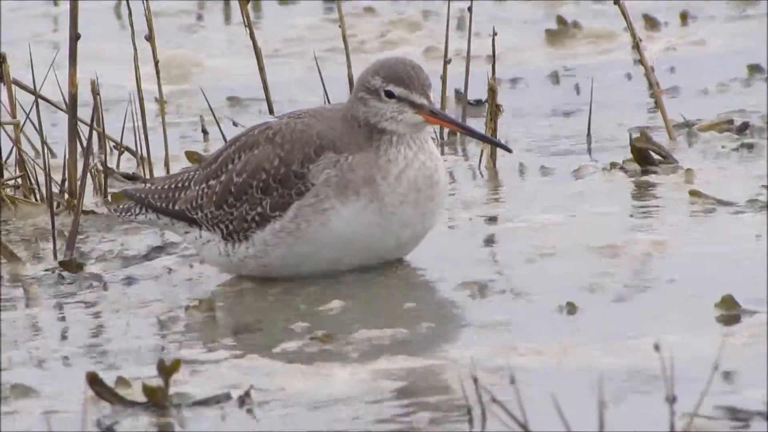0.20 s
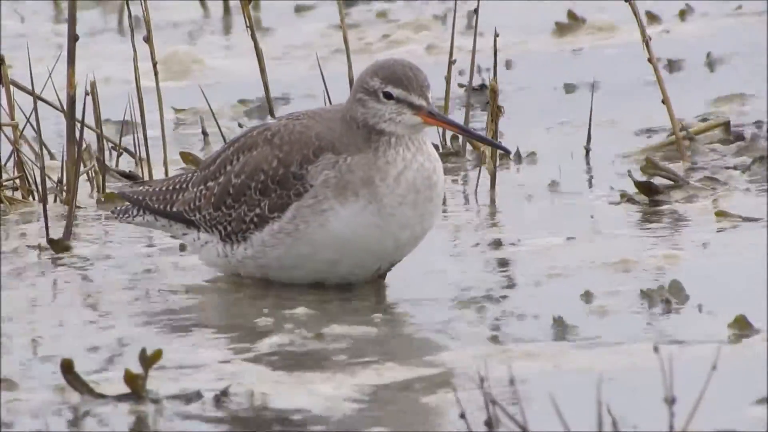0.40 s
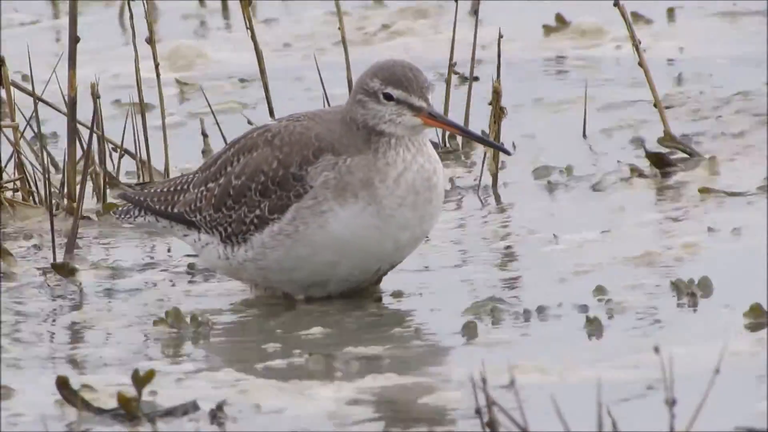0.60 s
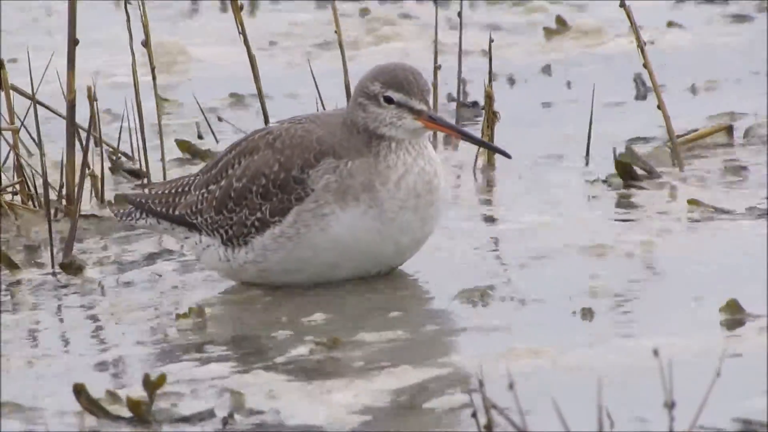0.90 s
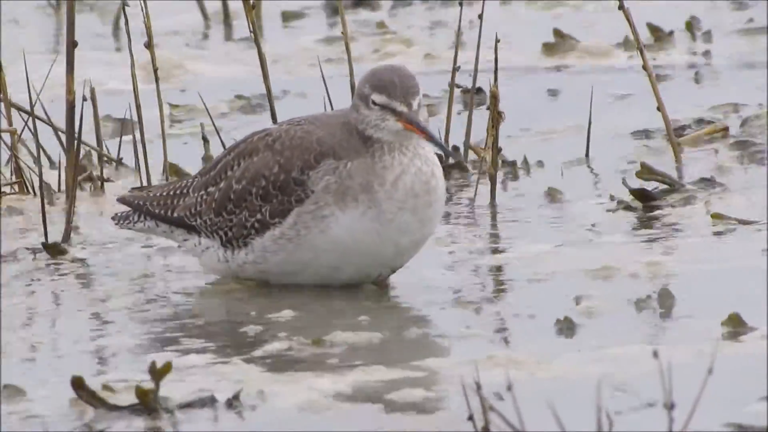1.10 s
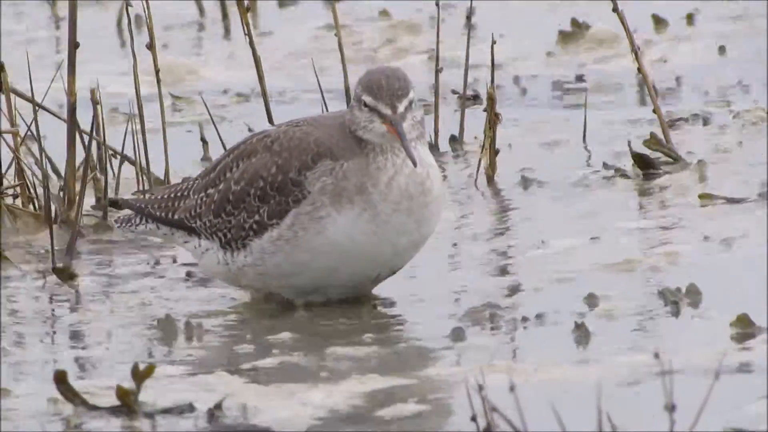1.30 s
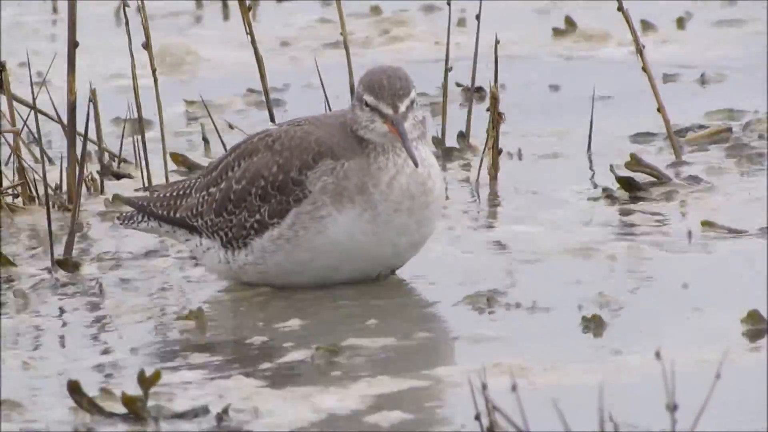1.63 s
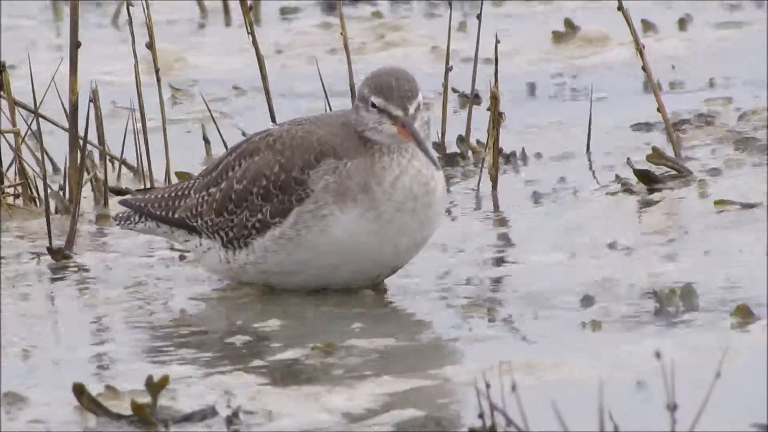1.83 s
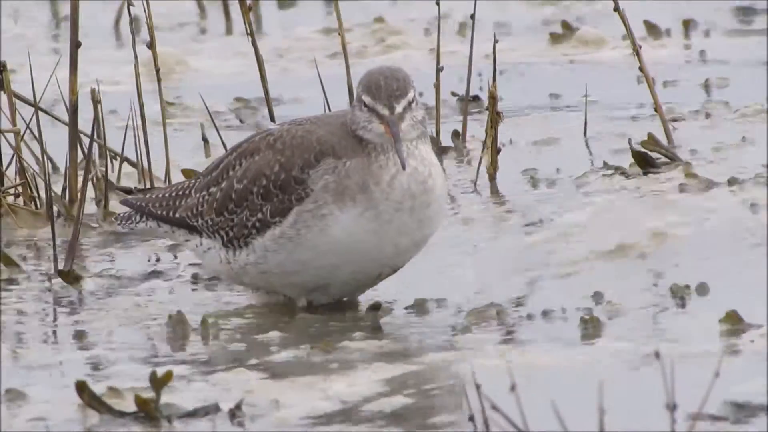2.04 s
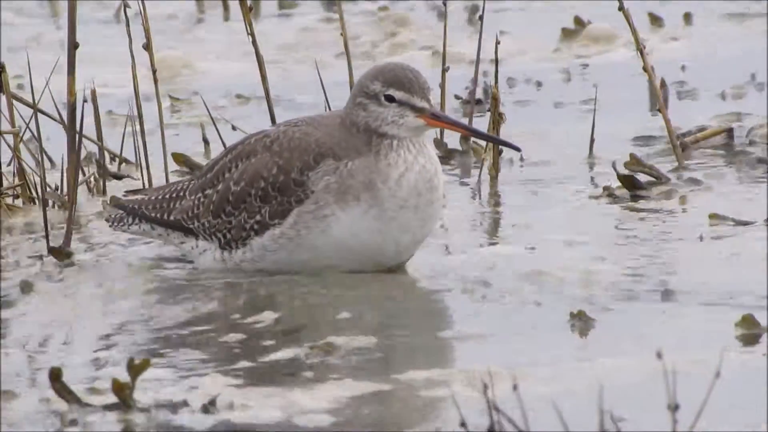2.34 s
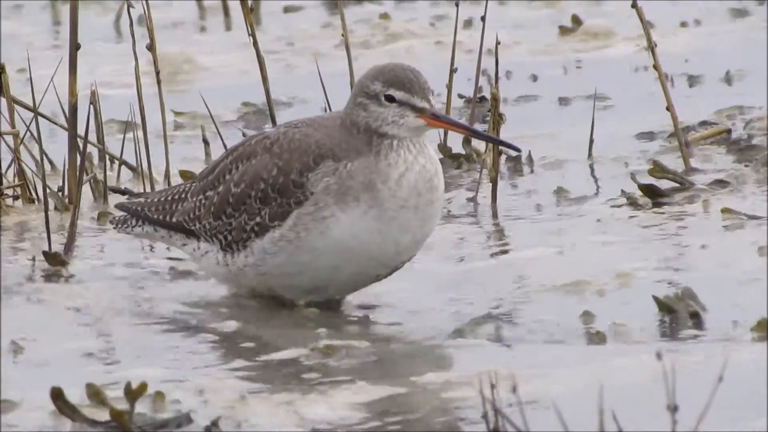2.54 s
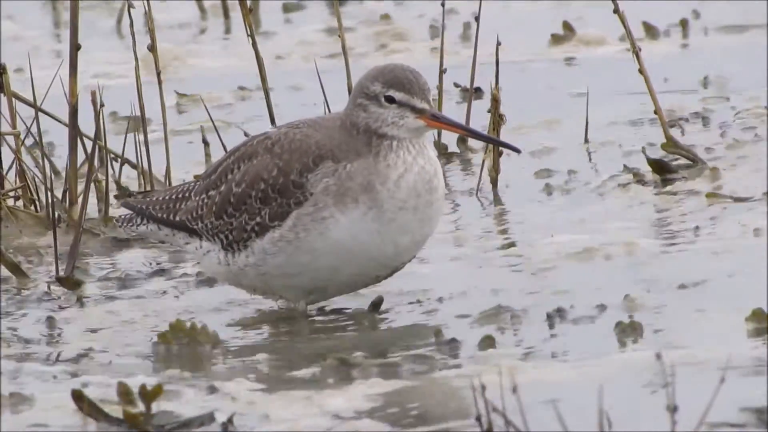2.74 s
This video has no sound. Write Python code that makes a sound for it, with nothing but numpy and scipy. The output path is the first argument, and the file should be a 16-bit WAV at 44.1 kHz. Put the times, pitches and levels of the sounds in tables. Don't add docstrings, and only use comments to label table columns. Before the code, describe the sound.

A wading bird repeats a harsh, rattly call six times, the last ones longer and one cracking, in shallow water outdoors; strong wind thumps and rumbles on the stereo microphone, louder than the bird.

```python
import sys
import numpy as np
from scipy import signal
from scipy.fft import rfft, irfft
from scipy.io import wavfile
from scipy.ndimage import uniform_filter1d

SR = 44100
rng = np.random.default_rng(int(sys.argv[2]) if len(sys.argv) > 2 else 0)


def gain_from_decibels(decibels):
    exponent = np.asarray(decibels, float) / 20
    return 10 ** exponent


def master(y):
    cut = np.clip(np.atleast_2d(y).T, -1, 1)
    pcm = np.round(cut * 32767)
    wavfile.write(sys.argv[1], SR, pcm.astype(np.int16))


N = 127890
T = np.arange(N) / SR
OPPOSED = np.array([[1], [-1]])


def level(x, db):
    return x * gain_from_decibels(db) / np.sqrt(np.mean(x ** 2))


def walk(rate):
    hold = int(SR / rate)
    steps = np.repeat(rng.standard_normal(N // hold + 1), hold)
    return 1.472 * uniform_filter1d(uniform_filter1d(steps, hold), hold)[:N]


def colour(x, points, lo_hz=0.77, hi_hz=19200.0):
    log_hz = np.log(np.arange(N // 2 + 1) * SR / N + 1)
    points = np.array(points, float)
    gain = gain_from_decibels(np.interp(log_hz, np.log(points[:, 0]), points[:, 1]))
    above_lo = 1 / (1 + np.exp(8 * (np.log(lo_hz) - log_hz)))
    above_hi = 1 / (1 + np.exp(8 * (np.log(hi_hz) - log_hz)))
    return irfft(rfft(x) * gain * (above_lo - above_hi), N)


def ramp(x):
    return np.sin(np.pi / 2 * np.clip(x, 0, 1)) ** 2


def thump(start, db, hz, cycles, turn):
    c = np.clip((T - start) * hz, -6, 12)
    swell = np.exp(-(c / (cycles * np.where(c < 0, .7, 1.2))) ** 2)
    return gain_from_decibels(db) * swell * np.cos(2 * np.pi * (c - 0.11 * c ** 2 + turn))


def wind():
    # (time [s], peak level [dB], frequency [Hz], opposed peak level [dB])
    buffets = [(0.366, -15.5, 143, -19), (0.465, -19.5, 117, -35), (0.555, -12, 173, 0),
               (0.569, -18, 150, -12.5), (0.617, -14.5, 280, -6), (0.729, -12.5, 119, -9.5),
               (0.762, -12.5, 183, -18), (1.077, -15, 159, -27.5), (1.234, -15.5, 143, -17.5),
               (1.334, -14.5, 196, -18), (1.364, -12, 134.5, -14.5), (1.436, -17.5, 124, -23.5),
               (1.545, -18, 186, -21), (1.558, -22, 243, -38), (1.646, -17, 127, -26),
               (1.663, -12, 159, -44), (1.697, -10.5, 127, -19.5), (1.718, -8.5, 155, -8.5),
               (1.742, -2, 196, -6.5), (1.777, -29, 146, -12.5), (1.876, -11, 226, -15),
               (2.011, -13.5, 196, -12.5), (2.2, -16.5, 142.6, -16.5), (2.235, -20.5, 101, -52),
               (2.437, -11.5, 126, -23), (2.449, -15, 161, -29), (2.549, -12, 106.4, -19),
               (2.58, -15, 149, -14.5), (2.629, -21, 106, -26), (2.852, -18, 192, -27)]
    # (time [s], peak level [dB])
    flaps = [(0.123, -25), (0.237, -20), (.294, -21), (0.659, -20.5), (0.831, -23), (0.86, -22),
             (0.938, -25.5), (.97, -21.5), (1.161, -25), (1.287, -29.5), (1.488, -25), (1.513, -29),
             (1.614, -29), (1.835, -21.5), (1.904, -24), (1.989, -24), (2.039, -22), (2.275, -23),
             (2.408, -21), (2.477, -18.5)]
    # (time [s], level [dB])
    gusts = np.array([(0, -39.5), (1.75, -35.5), (2.9, -39.5)])
    # (frequency [Hz], level [dB per Hz])
    mid_shape = [(22, -46), (45, -6.5), (75, 8), (130, 2), (200, -3.5), (330, -12.5), (600, -32),
                 (2500, -94)]
    # (frequency [Hz], level [dB per Hz])
    side_shape = [(30, -47.5), (60, -13), (110, -13), (190, -6), (270, -10), (450, -22), (750, -35.5),
                  (2500, -93)]
    # (frequency [Hz], level [dB])
    opposed_cut = [(20, -23), (60, -14), (150, 4.5), (800, 1)]
    flap_hz, flap_opposed_db = 113.7, -8
    buffet_cycles, opposed_cycles, opposed_hz = 0.58, 0.4, 238
    churn_s, churn_db = 0.018, 19.5
    wind_db, swell_db, flap_db, own_db = 3.5, 0.8, 2.2, 1.5

    mid, side, churn = 0, 0, 0
    hits = list(buffets) + [(s, db, flap_hz, db + flap_opposed_db) for s, db in flaps]
    for (s, db, hz, opposed_db), (a, b, c) in zip(hits, rng.random((len(hits), 3))):
        mid = mid + thump(s, db, hz, buffet_cycles, a)
        side_hz = .5 * hz + opposed_hz * (0.69 + 0.084 * c)
        side = side + thump(s, opposed_db, side_hz, opposed_cycles, b)
        spread_s = churn_s * np.where(T < s, .35, 1)
        churn = churn + (gain_from_decibels(db) + gain_from_decibels(opposed_db)) * np.exp(-((T - s) / spread_s) ** 2)

    gust = gain_from_decibels(np.interp(T, gusts[:, 0], gusts[:, 1]))
    shared = swell_db * walk(9.7) + flap_db * walk(44.97)
    edges_hz = (1, 70, 140, 280, 560, 2e4)
    depths = (0.25, 0.2, 1.01, 1.035, 0.92)
    beds = []
    for shape in (mid_shape, side_shape):
        bed = 0
        for lo, hi, depth in zip(edges_hz, edges_hz[1:], depths):
            sway = gain_from_decibels(depth * shared + own_db * walk(21.85))
            stir = 1 + depth * gain_from_decibels(churn_db) * churn
            bed = bed + colour(rng.standard_normal(N) * gust * stir * sway, shape, lo, hi)
        beds.append(bed * gain_from_decibels(wind_db) * 10)
    return mid + beds[0], colour(side, opposed_cut) + beds[1]


def air():
    # (frequency [Hz], level [dB])
    mid_shape = [(600, 1.5), (800, -2), (1600, -8.5), (2200, -14.5), (6000, -20.5), (14500, -24.5),
                 (15300, -28), (16000, -51.5)]
    # (frequency [Hz], level [dB])
    side_shape = [(600, -9), (900, -10.5), (1400, -14.5), (2100, -25), (4200, -28.5), (14500, -30.5),
                  (15300, -40), (16000, -58)]
    sway = gain_from_decibels(1.0 * walk(5.72) + 1.56 * walk(23.64))
    mid = colour(rng.standard_normal(N), mid_shape, lo_hz=560.0) * sway
    side = colour(rng.standard_normal(N), side_shape, lo_hz=560.0) * sway
    return level(mid, -63.5 + 5), level(side, -59.5)


def camera_whistle():
    whistle_hz, beat_hz = 15734.3, 13.49
    tone = np.sin(2 * np.pi * whistle_hz * T)
    twin = gain_from_decibels(-1) * np.sin(2 * np.pi * (whistle_hz + beat_hz) * T)
    return gain_from_decibels(-73.5) * np.sqrt(2) * (tone + twin)


def whine(start, length, db):
    harmonics_db = (-4.5, 2, -1.5, 4, -2.5, 1, -14, -11, -11, -41)
    from_hz, to_hz, rise_db = 570, 683, 5.5
    u = np.clip((T - start) / length, 0, 1)
    hz = (from_hz + (to_hz - from_hz) * u) * (1 + 0.0084 * walk(300))
    phase = 2 * np.pi * np.cumsum(hz) / SR
    tone = 0
    for k, harmonic_db in enumerate(harmonics_db):
        tone = tone + gain_from_decibels(harmonic_db - 0.25 * k * (1 - u)) * np.cos((k + 1) * phase + k ** 2)
    return level(tone, db) * gain_from_decibels(rise_db * u) * ramp(u / .15) * ramp((1 - u) / .07)


def snaps():
    # (time [s], peak level [dB], left-right difference [dB])
    edges = [(0.11, -33, 5), (0.367, -33, -2.5), (0.551, -21, -10), (0.613, -17, 3), (0.712, -29, -5),
             (0.72, -32, -9), (0.828, -31.5, -2), (1.074, -39, -7), (1.225, -39, 6), (1.33, -35, -1.0),
             (1.535, -41, 2), (1.553, -32.5, 5), (1.657, -39, -3), (1.68, -47, 7), (1.71, -23, 4),
             (1.737, -20.5, 10), (1.872, -28.5, 0), (1.986, -23, -1), (2.097, -37, 0.0),
             (2.194, -27.5, -13), (2.27, -37.5, 0.5), (2.421, -41, 3), (2.442, -33, -7), (2.537, -38, 2),
             (2.576, -27.5, 3), (2.844, -35, -1)]
    snap_hz, cycles, snap_db, opposed_db, late_s = 425, 0.77, -1.5, 1.5, 0.00296
    out = 0
    for (s, db, pan_db), (a, b) in zip(edges, rng.random((len(edges), 2))):
        hz = snap_hz * (0.78 + 0.27 * b)
        mid = thump(s + late_s, db + snap_db, hz, cycles, a)
        side = thump(s + late_s, db + snap_db, hz, cycles, a + 1 / 4)
        out = out + (mid + gain_from_decibels(opposed_db) * side * OPPOSED) * gain_from_decibels(pan_db / 2 * OPPOSED)
    return out


def call(start, length, top_hz, open_hz, gap_s, rate0, rate1, attack, bow,
         db, peak, fade_db, end_db, rasp_db, throat):
    step_hz, release_s, end_drop = 1002, 0.059, 0.26
    gap_share, gap_db, gap_drop, drop_share = 0.17, -12.5, 0.12, 0.14
    crack_from_s, crack_until_s, crack_heal_s, crack_left = 2.1, 2.47, .015, .05
    crack_share, crack_low, crack_high, crack_rest = .55, -.28, .42, -.12
    crack_flip_db, crack_rest_db, crack_tire_db = 0.5, -2.5, -13.5
    wobble, crack_wobble = .006, .018

    span = slice(int(start * SR), min(N, int((start + length) * SR)))
    t = T[span] - start
    u = t / length
    rise = np.clip(t / attack, 0, 1)
    end = 1 - ramp((length - t) / release_s)

    turns = np.cumsum(rate0 + (rate1 - rate0) * u) / SR
    jitter = 0.013 * np.cumsum(walk(60)[span]) * 60 / SR
    throb = (turns - np.interp(gap_s - start, t, turns) + jitter) % 1
    gap = np.exp(-(np.minimum(throb, 1 - throb) / gap_share) ** 2)
    dip = np.exp(-(np.minimum(throb, 2 * (1 - throb)) / drop_share) ** 2)

    heal = ramp((crack_until_s - T[span]) / crack_heal_s)
    crack = (T[span] > crack_from_s) * np.maximum(heal, crack_left)
    flipped = throb < crack_share
    flip = np.where(flipped, crack_low + (crack_high - crack_low) * throb / crack_share, crack_rest)

    climb = open_hz + (top_hz - open_hz) * np.sin(np.pi / 2 * rise)
    bend = 1 - bow * ((u - peak) / np.where(u < peak, peak, 1 - peak)) ** 2 - end_drop * end
    unsteady = (wobble * (1 + 6 * gap + 10 * end) + crack_wobble * crack) * walk(900)[span]
    hz = climb * bend * (1 - gap_drop * (1 - crack) * dip + crack * flip + unsteady)
    phase = 2 * np.pi * np.cumsum(hz) / SR

    k = np.arange(1, 13)[:, None]
    bright = 0.47 * crack - 2.0 * end - 0.59 * (1 - rise)
    throat_db = [-40, *throat, -45]
    steps = step_hz * np.arange(len(throat_db))
    harmonic_db = np.interp(k * hz, steps, throat_db) + k * bright
    voice = np.sum(gain_from_decibels(harmonic_db) * np.cos(k * phase + k ** 2), axis=0)
    rasp = colour(rng.standard_normal(N), list(zip(steps + 1, throat_db)))[span]

    crack_db = np.where(flipped, crack_flip_db, crack_rest_db + crack_tire_db * u)
    voice = level(voice * gain_from_decibels(gap_db * gap * (1 - .5 * crack) + crack * crack_db), 0)
    rasp = level(rasp * gain_from_decibels(-6 * gap), rasp_db) * gain_from_decibels(5 * crack + 4 * end - 8 * (1 - rise))
    opening_db = -45 * (1 - open_hz / top_hz) * (1 - rise) ** 1.5
    swell = gain_from_decibels(opening_db + fade_db * u + end_db * end) * ramp(t / .005) * ramp((length - t) / .008)
    out = np.zeros(N)
    out[span] = gain_from_decibels(db) * swell * (voice + rasp)
    return out


def bird():
    # (start [s], length [s], level [dB])
    whines = [
        (.096, .077, -51),
        (.592, .07, -54),
        (1.104, .068, -54),
    ]
    # (start [s], length [s], top pitch [Hz], opening pitch [Hz])
    calls = [
        (.168, .232, 1050, 800),
        (.658, .254, 1045, 800),
        (1.168, .266, 1048, 800),
        (1.632, .352, 1088, 620),
        (2.2, .405, 1003, 700),
        (2.822, .34, 1040, 560),
    ]
    # (time of one gap [s], rate at start [Hz], rate at end [Hz], attack [s], pitch bow [share])
    throbs = [(0.1855, 81.7, 86.8, 0.032, 0.037), (0.6793, 83.4, 83.5, .04, 0.044),
              (1.1938, 85.5, 85.8, .045, 0.036), (1.6802, 90.66, 82.5, .055, 0.12),
              (2.2605, 102.6, 90.85, .04, 0.041), (2.8642, 79, 78, .055, 0.097)]
    # (level [dB], place of pitch peak [0-1], fade [dB], closing [dB], rasp [dB])
    efforts = [(-38, 0.36, -4.5, -12, -6), (-42, 0.3, -1.5, -15, -3), (-41.5, 0.7, -1.5, -12, -3.5),
               (-38.5, 0.2, -3.2, -16, -9), (-43, 0.4, 1, -12, -7), (-38.5, 0.49, -18, -19, -1)]
    throats = [(-14.5, 0, -5, -4.5, -3, -9, -19, -23.5, -23),
               (-14, 0.0038, -1, -1.5, -8, -17, -15.5, -27, -25),
               (-11.5, 0, 0, 1, -6.5, -16, -12.5, -23, -26),
               (-22.5, 0, -20.5, -10, -19, -16.5, -32, -35, -46),
               (-18, 0, -21.5, -12, -16, -14.5, -31.5, -32, -33),
               (-13, 0, -26, -14, -17, -17.5, -45, -38, -44)]
    # (frequency [Hz], level [dB])
    notch = [(3000, -0.5), (3520, -2.5), (3950, -1.5)]
    pan_db, lag_s, echo_db, echo_t60_s = -1.5, 1.2e-5, -14.5, 0.13

    voices = sum(call(*c, *h, *e, a) for c, h, e, a in zip(calls, throbs, efforts, throats))
    dry_bird = colour(voices, notch) + sum(whine(*w) for w in whines)
    t = T[:SR // 4]
    tails = rng.standard_normal((2, len(t))) * gain_from_decibels(-60 * t / echo_t60_s) * ramp(t / 0.00092)
    tails = level(tails, echo_db) / np.sqrt(len(t))
    echo = signal.fftconvolve(dry_bird[None], tails, axes=1)[:, :N]
    hz = np.arange(N // 2 + 1) * SR / N
    late = irfft(rfft(dry_bird) * np.exp(-2j * np.pi * hz * lag_s), N)
    return np.array([dry_bird * gain_from_decibels(pan_db / 2), late * gain_from_decibels(-pan_db / 2)]) + echo


def plips():
    # (time [s], peak level [dB], pitch [Hz], length [s], upward glide [share])
    bubbles = [
        (.896, -50, 1120, .015, .1),
        (1.334, -48, 1180, .015, .08),
        (1.453, -38, 1000, .02, .35),
        (1.472, -54, 1480, .018, .12),
        (2.788, -54, 1350, .01, .05),
    ]
    out = 0
    for s, db, hz, length, glide in bubbles:
        u = (T - s) / length
        phase = 2 * np.pi * np.cumsum(hz * (1 + glide * np.clip(u, 0, 1))) / SR
        out = out + gain_from_decibels(db) * ramp(u / 0.061) * ramp((1 - u) / .5) * np.sin(phase)
    return out


def scene():
    wind_mid, wind_side = wind()
    air_mid, air_side = air()
    whistle = camera_whistle()
    mid = wind_mid + air_mid + whistle + plips()
    side = wind_side + air_side + .1 * whistle
    return mid + side * OPPOSED + snaps() + bird()


def band_limit(x):
    return signal.sosfilt(signal.butter(12, 15930, fs=SR, output="sos"), x)


def record(dry):
    mix = np.tanh(dry / 1.562) * 1.384
    return band_limit(mix)


dry = scene()
out = record(dry)
master(out)
```